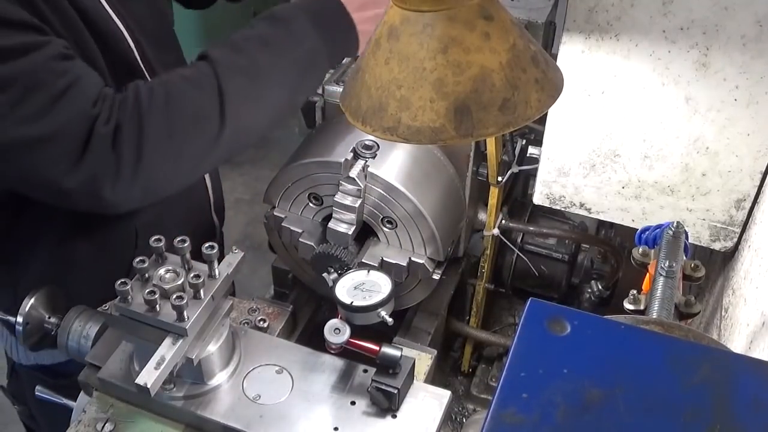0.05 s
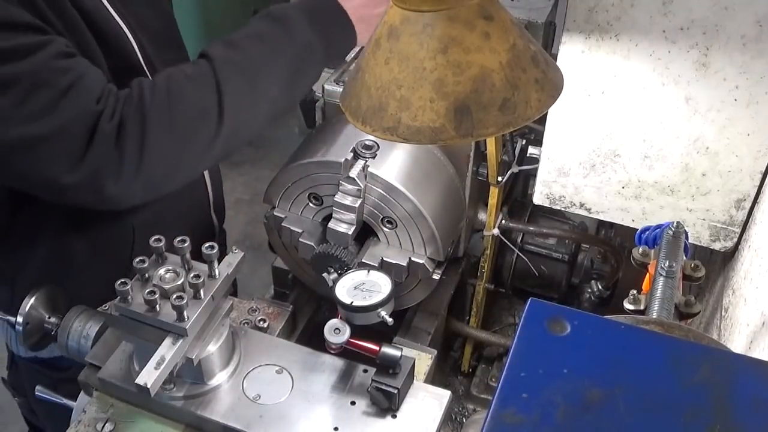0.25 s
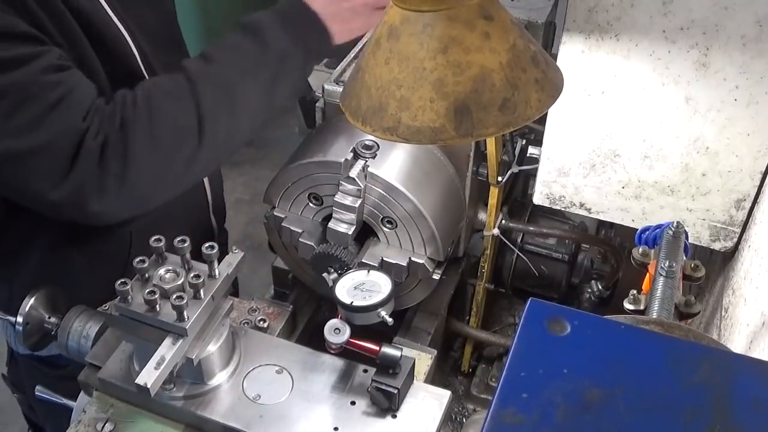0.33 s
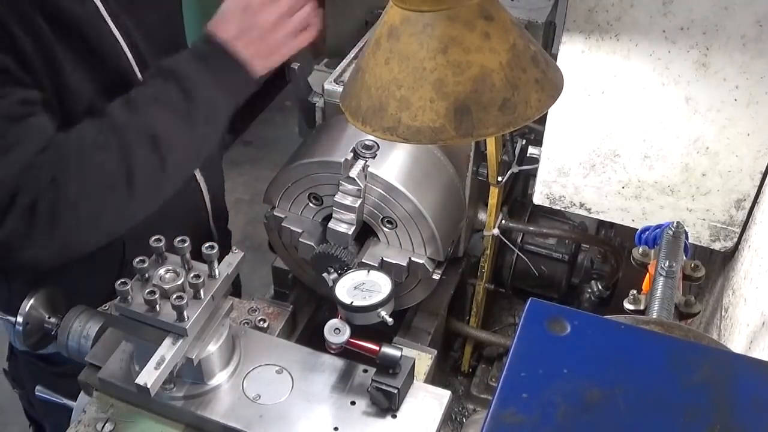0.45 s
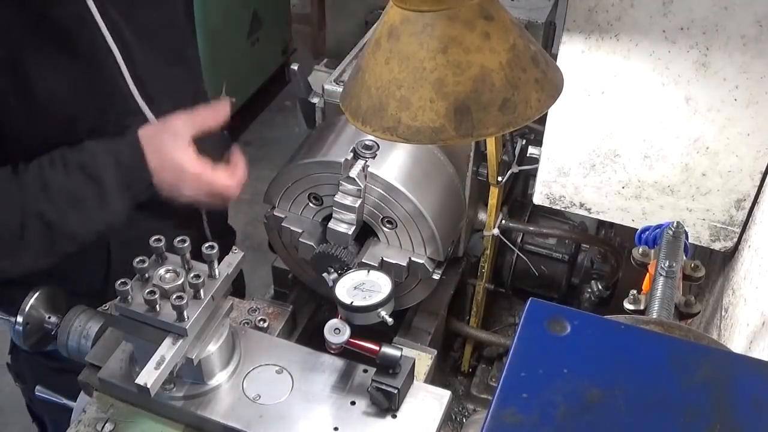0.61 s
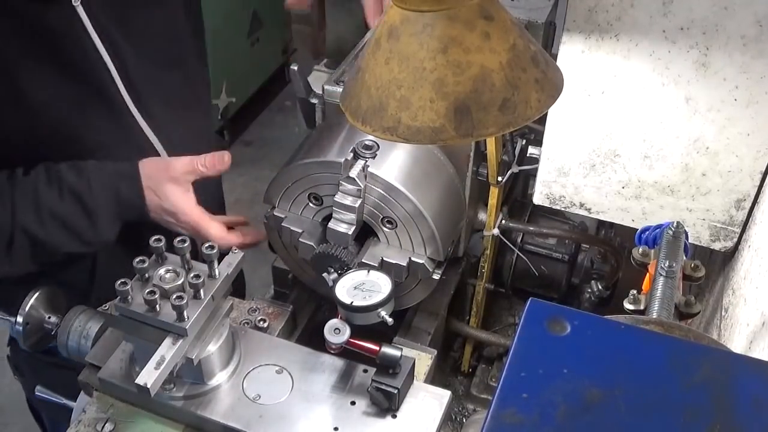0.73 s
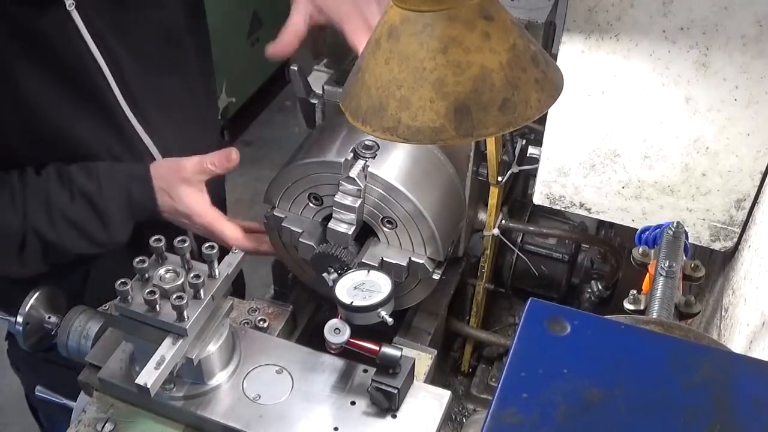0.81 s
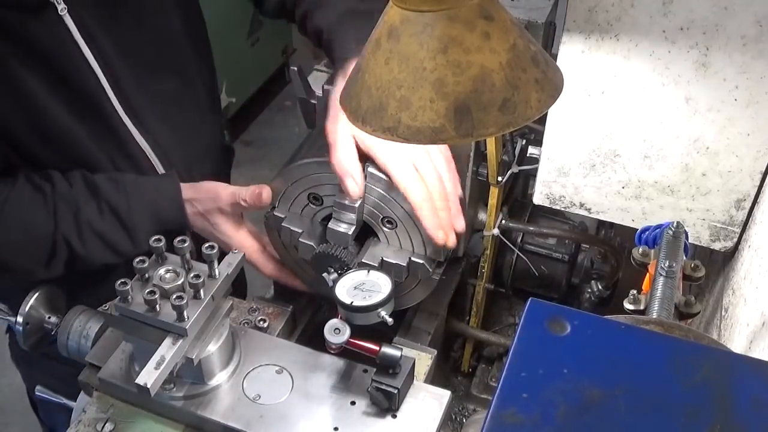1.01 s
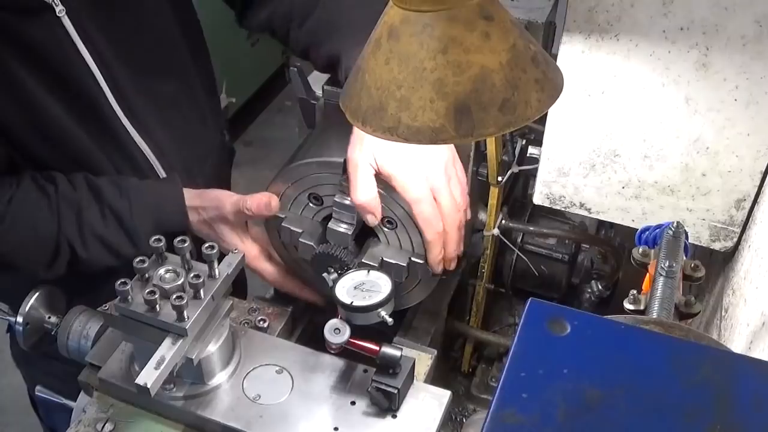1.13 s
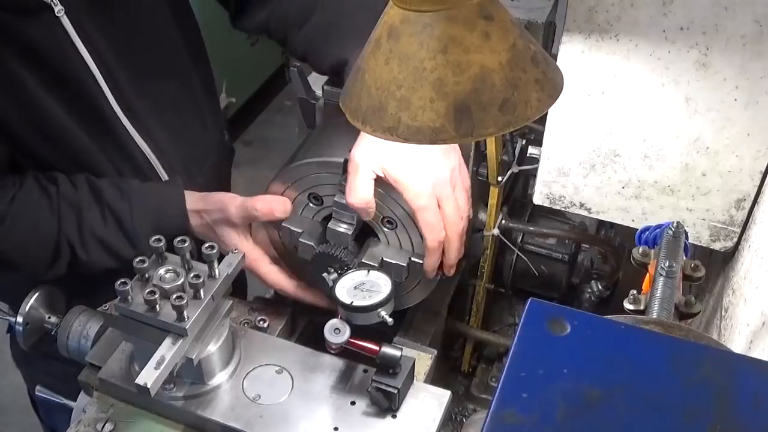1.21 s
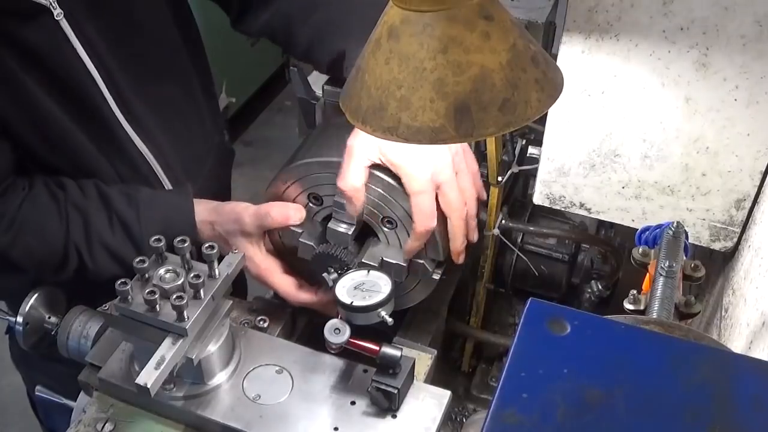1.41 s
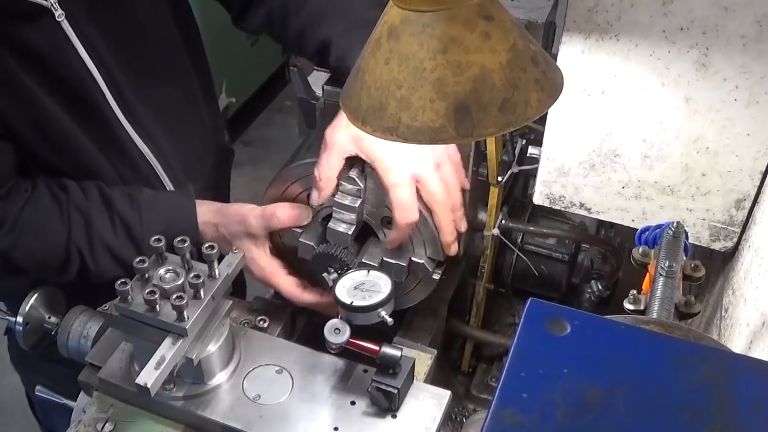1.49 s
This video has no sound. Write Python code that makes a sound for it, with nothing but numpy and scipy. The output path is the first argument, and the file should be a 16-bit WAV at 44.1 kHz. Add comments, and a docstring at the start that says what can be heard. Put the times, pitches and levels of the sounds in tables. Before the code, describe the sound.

A steel chuck key is put down on a lathe's cast-iron housing. A faint ring and soft scuff lead in, then a sharp clank at 0.25 s with bounces to 0.32, a weak tap near 0.4, and a brighter, denser rattle from 0.47 to 0.6. High ringing fades into small-workshop reverberation; faint hand scuffs near 0.9-1.0 and light brushing around 1.1-1.5 sit over quiet rumble and hiss.

```python
"""Small hard-walled workshop: a steel chuck key is laid on the cast housing of a lathe; it lands, rocks and bounces
twice over. Contacts choke the key's ringing handle and strike it anew (decaying modes) and knock the housing
(noise cracks plus decaying modes). Hands brush (grainy treble noise) and scuff (low noise).
Steady noise gives a quiet floor of room rumble and microphone hiss; noise tails give the reverberation."""
import sys
import numpy as np
from scipy import signal
from scipy.fft import rfft, irfft, next_fast_len
from scipy.io import wavfile
from scipy.ndimage import map_coordinates

SR = 44100
rng = np.random.default_rng(int(sys.argv[2]) if len(sys.argv) > 2 else 0)


def decibels_to_gain(level_db):
    """Convert a level in decibels to a linear amplitude gain (20 dB per decade)."""
    exponent = np.asarray(level_db, float) / 20
    return 10 ** exponent


def dump(signal):
    """Clip the signal to [-1, 1] and save it as 16-bit WAV at the path in sys.argv[1]."""
    limited = np.clip(np.atleast_2d(signal).T, -1, 1)
    pcm = np.round(limited * 32767).astype(np.int16)
    wavfile.write(sys.argv[1], SR, pcm)


N = 68355
LEAD = SR // 10  # samples before t = 0, for contacts at negative times
ATTACK_S, STIFF_LATE_S = 0.00036, 0.000862


def unit(x):
    """Scale to rms 1."""
    return x / np.sqrt(np.mean(x ** 2) + 1e-20)


def along(points, hz):
    """Interpolate (f/Hz, value) points on a log frequency axis."""
    f, v = np.transpose(points)
    return np.interp(np.log(hz + 1), np.log(f + 1), v)


def filtered(x, response):
    """Apply a zero-phase frequency response."""
    m = next_fast_len(x.shape[-1] + 8192)
    gain = response(np.fft.rfftfreq(m, 1 / SR))
    return irfft(rfft(x, m) * gain, m)[..., :x.shape[-1]]


def coloured(x, points):
    """Shape noise by a (f/Hz, level/dB) spectrum."""
    return filtered(x, lambda hz: decibels_to_gain(along(points, hz)))


def paired(two, alike):
    """Mix two unrelated signals into left and right of given likeness (correlation) by frequency."""
    def mid_side_gains(hz):
        turn = np.arccos(np.clip(along(alike, hz), -1, 1)) / 2
        return np.array([np.cos(turn), np.sin(turn)])

    mid, side = filtered(two, mid_side_gains)
    return np.array([mid + side, mid - side])


def ring(hz, db, t60, t):
    """One exponentially dying mode with a soft onset, silent before t = 0."""
    t = np.maximum(t, 0)
    onset = 1 - np.exp(-t / ATTACK_S)
    return decibels_to_gain(db - 60 * t / t60) * np.sin(2 * np.pi * hz * t) * onset


def family(modes, db, scatter_db, t):
    """Modes of one body, each a little stronger or weaker on every blow."""
    luck_db = scatter_db * rng.standard_normal(len(modes))
    return sum(ring(hz, db + g + luck, t60, t) for (hz, g, t60), luck in zip(modes, luck_db))


def add(track, s, sound):
    """Lay a sound on the track at time s."""
    part = track[LEAD + round(s * SR):][:len(sound)]
    part += sound[:len(part)]


# rumble and hiss spectrum: f/Hz, relative level/dB
FLOOR_SPECTRUM = [(25, -30), (60, -9), (108, -5.5), (176, -8.5), (320, -17), (860, -19.5), (2000, -20.5),
                  (6000, -23), (10100, -25.5), (11500, -45.5)]
# left-right likeness of the floor: f/Hz, correlation/1
FLOOR_LIKENESS = [(60, 1), (220, 0.86), (840, 0.13), (3140, 0.63), (11000, 0.83)]
FLOOR_DB = -58  # rms ahead of the low cut


def floor():
    """Room rumble and microphone hiss: steady coloured noise."""
    noise = coloured(rng.standard_normal((2, N)), FLOOR_SPECTRUM)
    return decibels_to_gain(FLOOR_DB) * unit(paired(noise, FLOOR_LIKENESS))


# housing contacts: t/s, crack level/dB, clack level/dB, knock level/dB, thud level/dB
HOUSING_CONTACTS = [(-.025, -29, -36, -30, -46), (.2476, -15, -36, -23, -28), (.2808, -16, -15, -25, -44),
                    (.2870, -34, -36, -26, -50), (.3018, -21, -15, -24, -36), (.3070, -28, -30, -20, -40),
                    (.3125, -21, -16, -24, -36), (.3205, -27, -34, -25, -38), (.3970, -33, -40, -33, -42),
                    (.4500, -40, -42, -38, -48), (.4748, -18, -19, -30, -33), (.5018, -23, -21, -22, -38),
                    (.5222, -22, -17, -22, -42), (.5370, -24, -18, -21, -42), (.5430, -28, -32, -23, -40),
                    (.5530, -30, -32, -27, -33), (.5575, -27, -27, -26, -38), (.5920, -36, -42, -29, -46)]
# crack spectrum: f/Hz, relative level/dB
CRACK_SPECTRUM = [(180, -20), (300, -12), (1200, -15.5), (2830, -15), (4600, -11.5), (5610, -9), (6150, -7),
                  (9870, -26), (11500, -42), (15000, -77), (22000, -120)]
# housing modes: f/Hz, relative level/dB, t60/s
CLACK_MODES = [(3950, 4, .011), (4150, 2, .012), (4560, 0, .012), (5300, -3, .01)]
KNOCK_MODES = [(1678, -7, 0.028), (1958, -4.5, 0.029), (2106, 1.5, 0.023), (2413, -1, 0.028),
               (2577, -1, 0.021), (2760, -2, 0.01)]
THUD_MODES = [(170, -15.5, 0.091), (223.7, -1.5, 0.11), (323, -7.5, 0.064), (539, -4.5, 0.045),
              (616.5, 1, 0.031), (937, -2.5, 0.027)]
CRACK_TRIM_DB, CRACK_T60_S, THUD_LATE_S = 1.5, .02, 0.00606


def housing():
    """Each contact gives a noise crack and rings the housing's clack, knock and thud modes."""
    out, t = np.zeros(LEAD + N), np.arange(SR // 4) / SR
    onset = 1 - np.exp(-t / ATTACK_S)
    grit = unit(coloured(rng.standard_normal((len(HOUSING_CONTACTS), len(t))), CRACK_SPECTRUM))
    for (s, crack_db, clack_db, knock_db, thud_db), noise in zip(HOUSING_CONTACTS, grit):
        crack = decibels_to_gain(crack_db + CRACK_TRIM_DB - 60 * t / CRACK_T60_S) * onset * noise
        clack = family(CLACK_MODES, clack_db, 1.25, t - STIFF_LATE_S)
        knock = family(KNOCK_MODES, knock_db, 2.5, t)
        thud = family(THUD_MODES, thud_db, 2.5, t - THUD_LATE_S)
        add(out, s, crack + clack + knock + thud)
    return out


# key contacts: t/s, level/dB of handle modes 1, 2 and 3, shank level/dB
KEY_CONTACTS = [(-.015, -40.5, -32, -38, -29), (.0230, -59, -55, -51.5, -49),
                (0.2478, -20, -49, -43, -25.5), (0.2806, -36, -52, -21, -38),
                (0.3021, -32.5, -39, -28.5, -40), (0.3124, -49, -29, -16, -33),
                (0.3203, -40.5, -53, -34, -40), (.3970, -37, -38.5, -39.5, -48),
                (.4500, -39.5, -41, -45.5, -53), (.4748, -48, -23, -15.5, -32), (.5018, -48, -27, -14, -29),
                (.5222, -50, -36, -18, -34), (.5370, -52, -38, -21, -38), (.5475, -51, -36, -30, -32),
                (.5530, -54, -37, -22.5, -28), (.5625, -52, -44, -29.5, -27.5),
                (.5800, -57, -46.5, -35, -53)]
# handle bending modes: f/Hz, t60/s
HANDLE_MODES = [(1227, .22), (3283, .45), (6160, .5)]
# shank modes: f/Hz, relative level/dB, t60/s
SHANK_MODES = [(4507, 1, 0.042), (5290, 3.5, 0.043), (5430, -2, .03), (6900, -5.5, 0.047),
               (7400, -16, 0.024), (7900, -5, .02)]
# mode of the key's square end: f/Hz, t60/s
TIP_MODE = (8332, .11)
# contacts that ring the square end: t/s, level/dB
TIP_CONTACTS = [(.2495, -40), (.2815, -44), (.4755, -42), (.5060, -32), (.5380, -39)]
# each contact holds the key for a moment: stiff modes speak later
LATE_S_PER_MODE, CHOKE_S = .001, 0.00024
# the ring's level wavers at random, a rough beating as of close twin modes
WAVER_DB, WAVER_PER_S = 1.5, 90


def choke(t, until):
    """The next contact stops the ring: fast exponential decay."""
    return np.exp(-np.maximum(t - until, 0) / CHOKE_S)


def key():
    """Handle modes ring from one contact to the next; shank and square end die by themselves."""
    out, t = np.zeros(LEAD + N), np.arange(SR // 2) / SR
    ends = [row[0] for row in KEY_CONTACTS[1:]] + [N / SR]
    for (s, *levels, shank_db), end in zip(KEY_CONTACTS, ends):
        handle = sum(ring(hz, db, t60, t - LATE_S_PER_MODE * k)
                     for k, (db, (hz, t60)) in enumerate(zip(levels, HANDLE_MODES)))
        shank = family(SHANK_MODES, shank_db, 1.25, t - STIFF_LATE_S)
        add(out, s, handle * choke(t, end - s) + shank)
    tip_hz, tip_t60 = TIP_MODE
    for s, db in TIP_CONTACTS:
        add(out, s, ring(tip_hz, db, tip_t60, t))
    knots = np.arange(len(out)) * WAVER_PER_S / SR
    waver = map_coordinates(rng.standard_normal(int(knots[-1]) + 4), [knots])
    return out * decibels_to_gain(WAVER_DB * waver)


# near tail decay: f/Hz, t60/s
NEAR_T60 = [(100, 0.48), (300, 0.64), (700, 0.74), (2000, 0.51), (5000, 0.33), (10000, 0.44)]
# left-right likeness of the tails: f/Hz, correlation/1
TAIL_LIKENESS = [(200, 1), (1000, 0.76), (5000, 0.64)]
NEAR_DB, FAR_DB, FAR_T60_S, WALL_S = -2, -36.5, 3.9, .004


def room(x):
    """Convolve each row with its own noise tail: near, dying by frequency, plus faint and longer."""
    noise = rng.standard_normal((len(x), 2, 3 * SR // 2))
    hz, t, z = signal.stft(noise, SR, nperseg=256)
    tail = 0
    for db, t60 in ((NEAR_DB, along(NEAR_T60, hz)[:, None]), (FAR_DB, FAR_T60_S)):
        dying = signal.istft(z * decibels_to_gain(-60 * t / t60), SR, nperseg=256)[1]
        tail = tail + decibels_to_gain(db) * dying / np.linalg.norm(dying[0, 0])
    stereo = [paired(v, TAIL_LIKENESS) for v in tail]
    delayed = np.pad(stereo, ((0, 0), (0, 0), (round(WALL_S * SR), 0)))
    return signal.fftconvolve(x[:, None], delayed, axes=2)[..., :x.shape[1]].sum(axis=0)


# chatter between the contacts: start t/s, end t/s, rate/(1/s), mean level/dB
CHATTER_SPANS = [(.3, .335, 300, -33), (.495, .585, 600, -29)]
CHATTER_HZ, CHATTER_SPREAD_LN, CHATTER_T60_S = 3300, .8, .007  # median, +- log range, decay


def chatter():
    """Small contacts at random times: short single-mode ticks of random pitch and level."""
    out, t = np.zeros(LEAD + N), np.arange(SR // 50) / SR
    for start, end, rate, db in CHATTER_SPANS:
        for when, pitch, size in rng.random((round(rate * (end - start)), 3)):
            hz = CHATTER_HZ * np.exp(CHATTER_SPREAD_LN * (2 * pitch - 1))
            tick = ring(hz, db + 8 * (size - .5), CHATTER_T60_S, t)
            add(out, start + when * (end - start), tick)
    return out


def swells(rows):
    """Sum of bell-shaped swells of level."""
    t = np.arange(N) / SR
    return sum(decibels_to_gain(db) * np.exp(-.5 * ((t - s) / length) ** 2) for s, db, length in rows)


# low scuffs of the hand on the casting: t/s, rms level at the peak/dB, bell sigma/s
SCUFF_SWELLS = [(.11, -52.5, 0.073), (.19, -68, 0.013), (.87, -58.5, .03), (1.03, -57.5, 0.016),
                (1.36, -66, 0.011)]
# scuff spectrum: f/Hz, relative level/dB
SCUFF_SPECTRUM = [(150, -5), (300, 0), (500, -11), (1000, -22.5)]
# hands and sleeves brushing: t/s, rms level at the peak/dB, bell sigma/s
BRUSH_SWELLS = [(.181, -61, .003), (.208, -64, .004), (1.11, -67, .008), (1.21, -63, .012),
                (1.32, -62, .015), (1.348, -56, .009), (1.505, -64, .012)]
# brush spectrum: f/Hz, relative level/dB
BRUSH_SPECTRUM = [(2000, -30), (4500, -10), (6500, -1.5), (9000, 0), (11000, -6)]


def hands():
    """Friction noise in soft swells: a low scuff and a grainy treble brush."""
    scuff = unit(coloured(rng.standard_normal(N), SCUFF_SPECTRUM))
    grain_db = 3 * rng.standard_normal(N // 64 + 1).repeat(64)[:N]
    brush = unit(coloured(rng.standard_normal(N) * decibels_to_gain(grain_db), BRUSH_SPECTRUM))
    return swells(SCUFF_SWELLS) * scuff + swells(BRUSH_SWELLS) * brush


# times from which a fresh random room tail is used: t/s
TAIL_CHANGES = [.247, .474, .5215]
PAN_DB, KEY_ROOM_DB = [[-1.4], [1.4]], -7  # left and right; key's send to the room


def scene():
    """Key and housing a little to the right, with a fresh random room tail from each tail change."""
    steel, iron = key(), housing() + chatter()
    t = (np.arange(LEAD + N) - LEAD) / SR
    span = np.searchsorted(TAIL_CHANGES, t) == np.arange(len(TAIL_CHANGES) + 1)[:, None]
    direct = (steel + iron) * decibels_to_gain(PAN_DB)
    reverb = room((decibels_to_gain(KEY_ROOM_DB) * steel + iron) * span)
    return (direct + reverb)[:, LEAD:] + hands() + floor()


def roll_off(x):
    """The treble ends steeply here."""
    return signal.sosfilt(signal.butter(12, 12350, fs=SR, output="sos"), x)


LOW_CUT_HZ, TOP_HZ = 70.7, 11050  # -6 dB point, brick-wall limit


def record(dry):
    """Low cut and band limit of the microphone."""
    mix = filtered(dry, lambda hz: (hz < TOP_HZ) * hz ** 2 / (hz ** 2 + LOW_CUT_HZ ** 2))
    return roll_off(mix)


dry = scene()
out = record(dry)
dump(out)
```